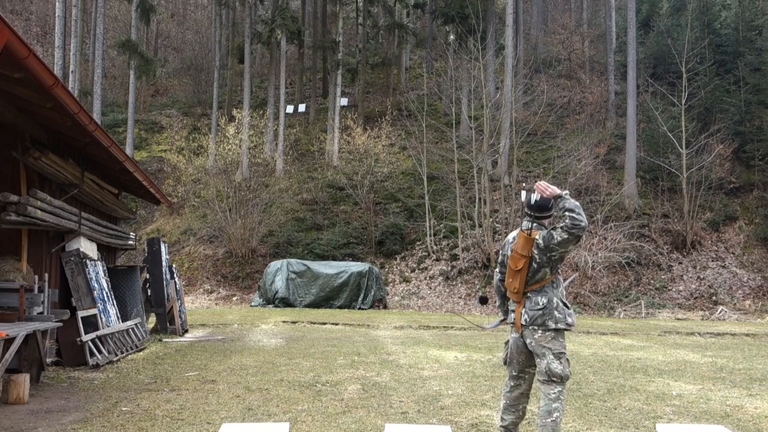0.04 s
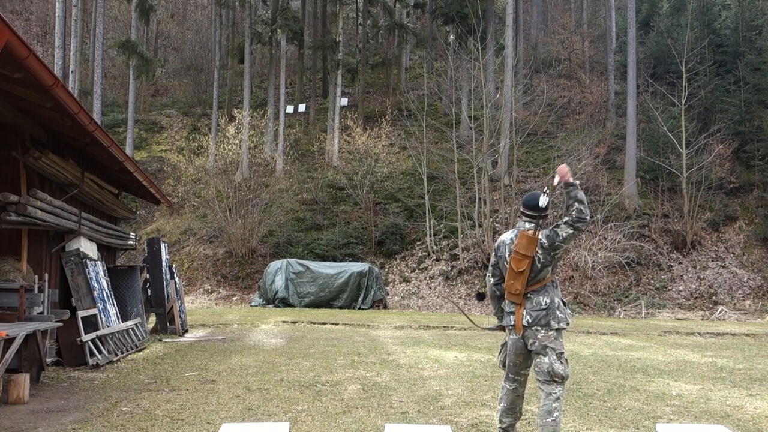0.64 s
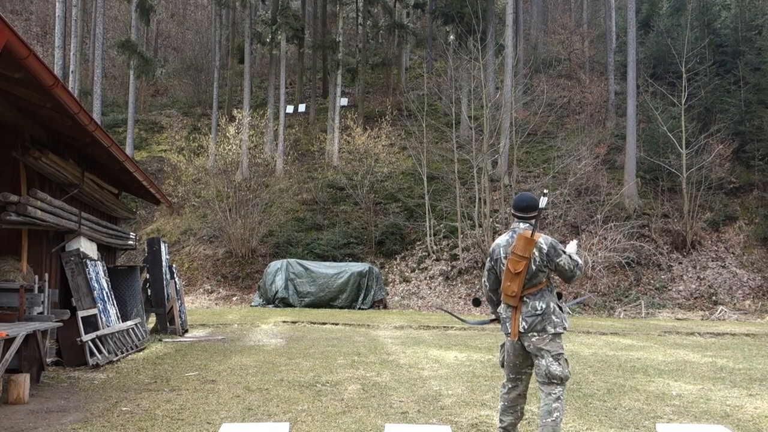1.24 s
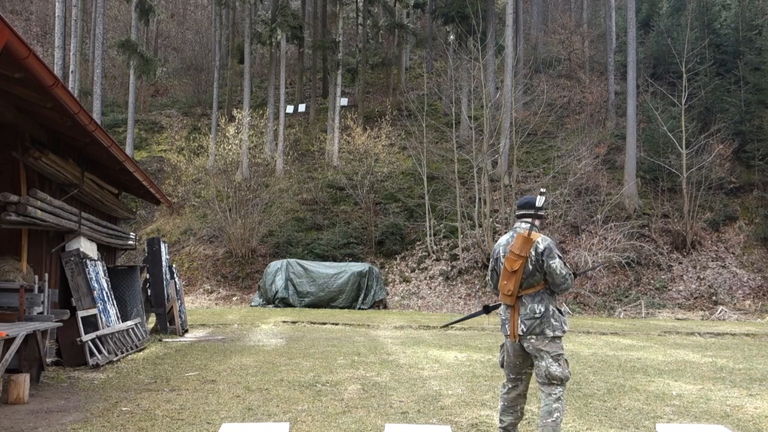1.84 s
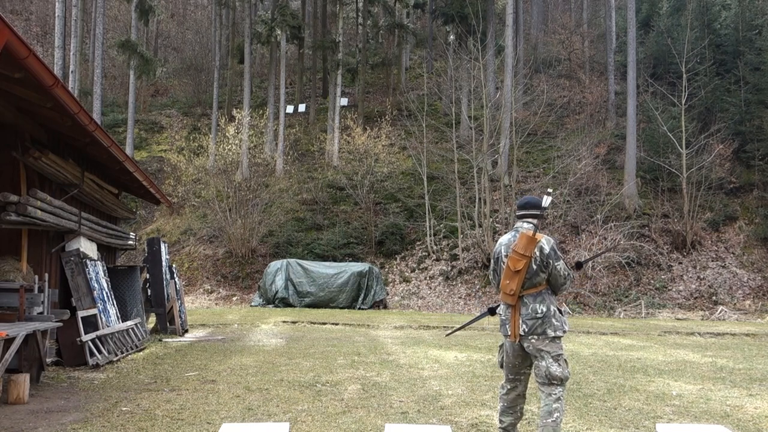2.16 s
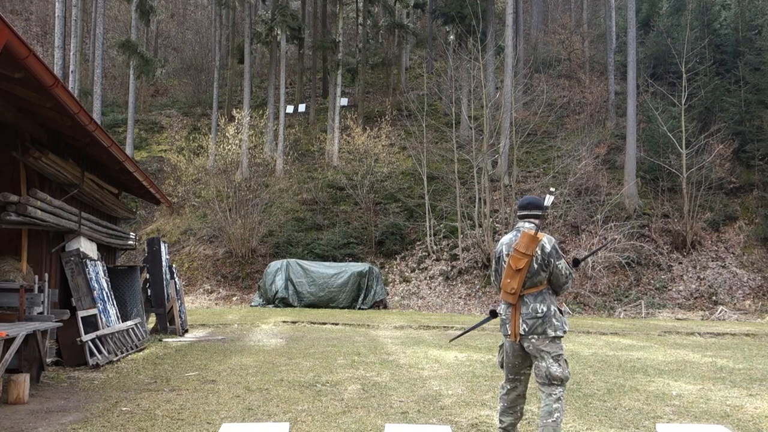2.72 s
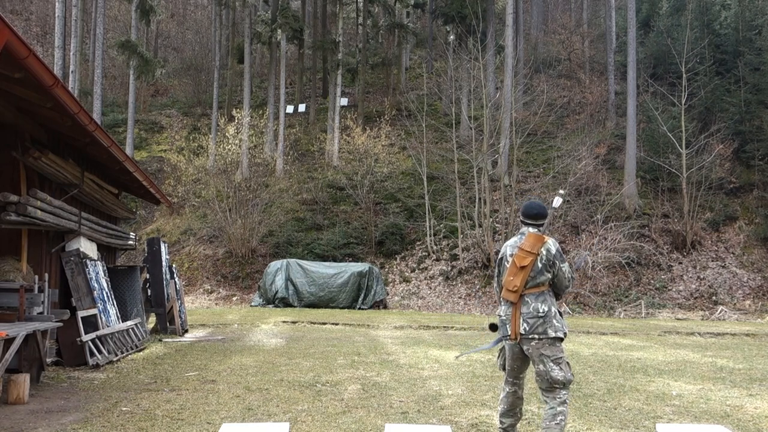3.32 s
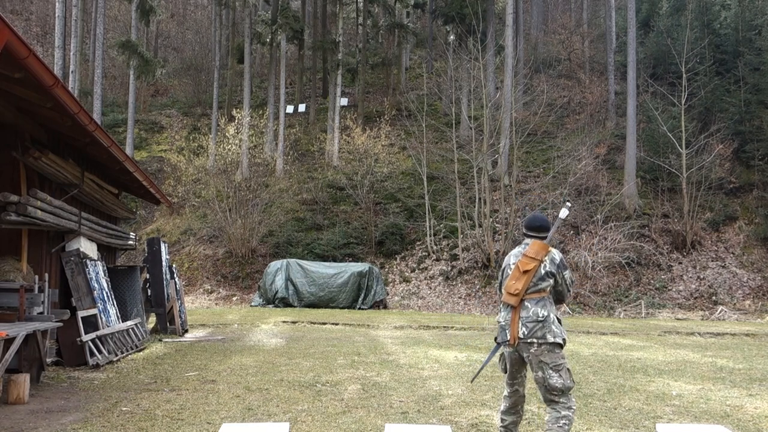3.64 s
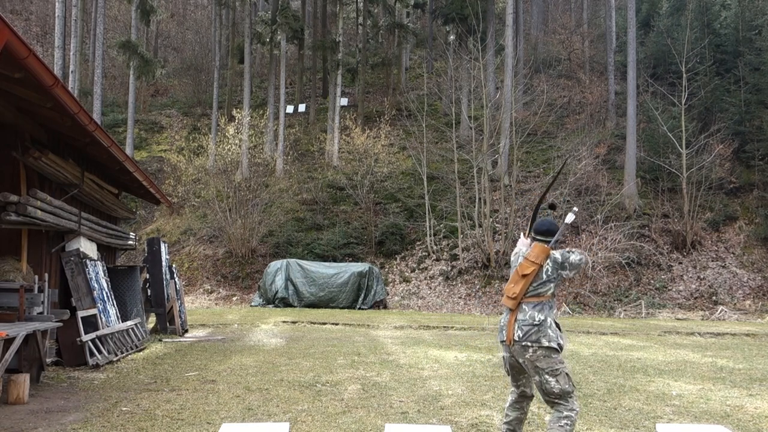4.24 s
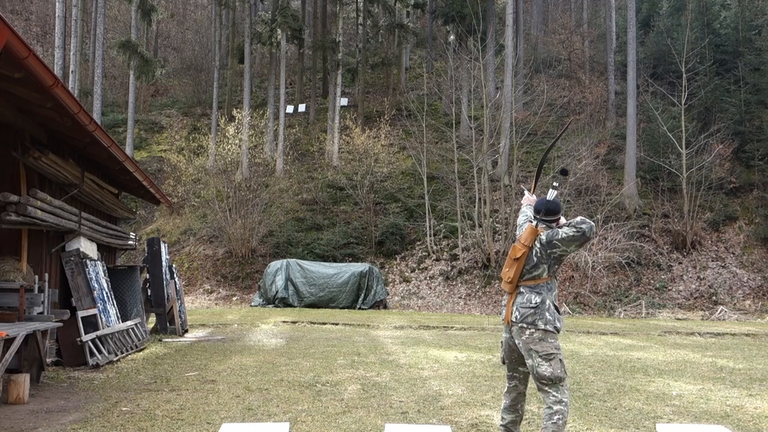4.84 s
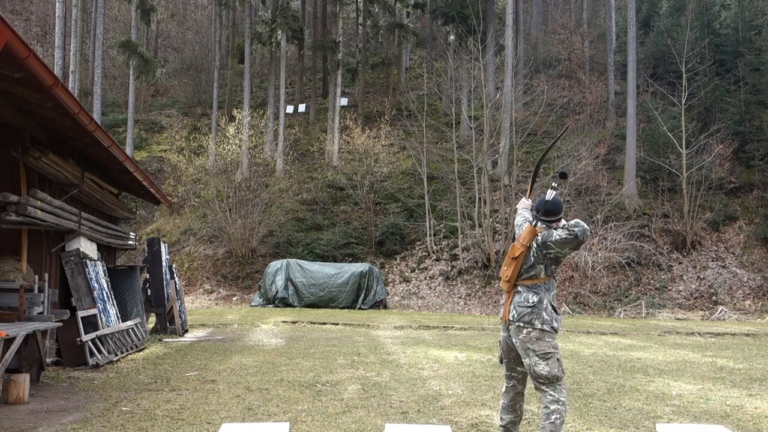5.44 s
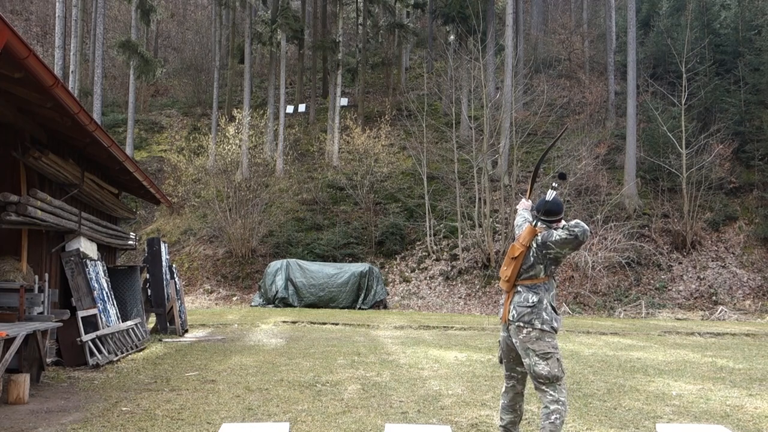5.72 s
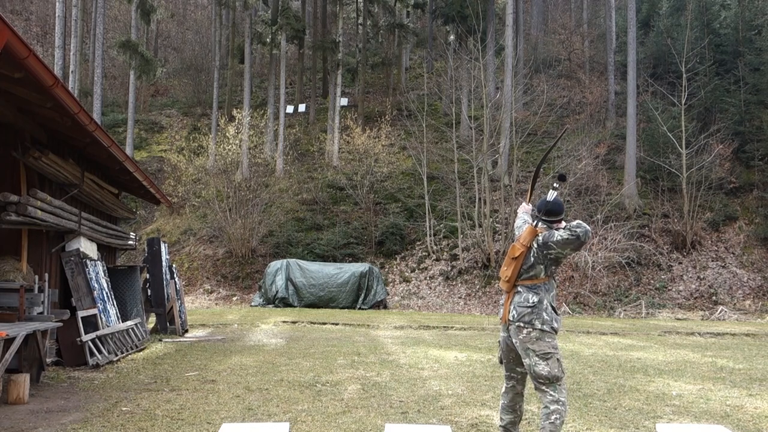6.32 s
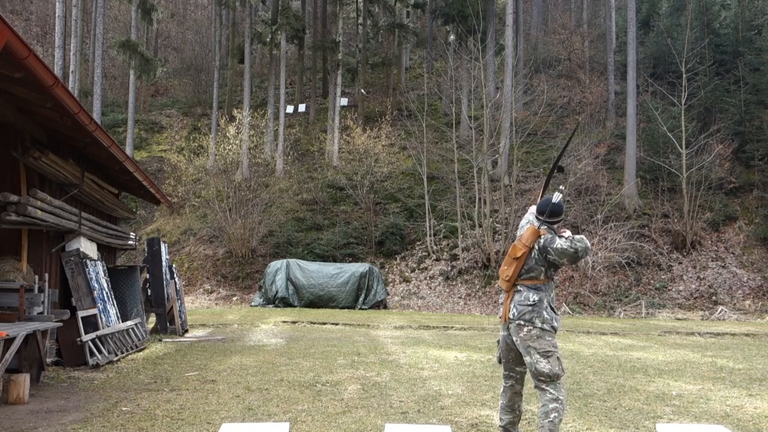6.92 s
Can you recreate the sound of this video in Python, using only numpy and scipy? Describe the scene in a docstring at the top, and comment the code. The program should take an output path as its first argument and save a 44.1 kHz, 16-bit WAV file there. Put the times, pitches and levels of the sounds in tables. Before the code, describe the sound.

Gusty wind rumbles on the microphone while arrows rattle lightly, faint birds chirp, and a bow fires with a sharp snap.

```python
"""Gusts of wind rumble and thump on the microphone while arrows knock together in a back quiver.
An archer at the forest edge pulls one out, clicks it onto the string and, near the end, shoots.
The string cracks taut and shakes the bow; the shot echoes off a wooden shed and dies among the trees.
The wind noise comes from eddies, little swirls of air that sweep over the microphone's two openings.
Small birds call over the soft hiss of the forest."""
import sys
import numpy as np
from scipy import signal
from scipy.fft import rfft, irfft
from scipy.io import wavfile
from scipy.ndimage import uniform_filter1d, minimum_filter1d, map_coordinates

SR = 44100
rng = np.random.default_rng(int(sys.argv[2]) if len(sys.argv) > 2 else 0)


def to_wav(s):
    """Save 16-bit WAV."""
    ch = np.atleast_2d(s).T  # columns
    pcm = np.round(np.clip(ch, -1, 1) * 32767)  # PCM
    wavfile.write(sys.argv[1], SR, pcm.astype(np.int16))


N = 311787
T = np.arange(N) / SR
HZ = np.maximum(np.arange(N // 2 + 1) * SR / N, 1)


# blows of the string on the bow (time [s], level [dB], treble boost [dB per octave])
STRING_BLOWS = [(6.798, -33, -1.5), (6.8, -27, 0.5), (6.8036, -25, -3.5), (6.8171, -33.5, -1.5)]
# ringing tones of bow, string and arrow (pitch [Hz], level [dB], time to fade by 60 dB [s])
BOW_TONES = [(118.6, -1.5, 0.1), (330, 2, 0.06), (387, 13.5, 0.036), (484.6, 5, 0.046), (716, -4, 0.039),
             (853, -2, 0.07), (1099, -2, 0.036), (1200, -7, 0.084), (2012, -10, 0.065), (2232, -8, .025),
             (2426, -1, 0.033), (2940, -2, 0.05), (3040, -6, 0.055), (3440, -6, 0.04), (4136, -13, 0.04),
             (5000, -20, 0.02), (6940, -4, 0.0088)]
# tone colour of the string's crack (frequency [Hz], level [dB])
CRACK_COLOUR = [(150, 5), (500, 9), (1500, -1), (2800, -3), (4500, -3), (7500, -12), (11000, -23),
                (15500, -42)]
CRACK_S = STRING_BLOWS[1][0]
def shot():
    """The string swishes forward, cracks taut and shakes the bow."""
    bow = np.zeros(N)
    for s, db, tilt_db in STRING_BLOWS:
        add(bow, s, undb(db) * strike(BOW_TONES, tilt_db, scatter_db=1.5))
    since = T - CRACK_S
    gap = abs(since)
    swish = undb(-41) * hiss(N, 1500, 2900) * fade(gap, .075) * (since < 0)
    crack = undb(-25.5) * noise(CRACK_COLOUR) * np.where(since < 0, fade(gap, .0035), fade(gap, .011))
    rattle = undb(-42) * hiss(N, 1300, 3800) * fade(gap, .05) * (since > 0)
    # the feathers hiss for a moment as the arrow flies off
    feathers = noise([(600, 12), (1800, -3), (3000, -3), (5000, -11), (8000, -18),
                      (12000, -30), (15500, -29)])
    flight = np.clip(since / .01, 0, 1) * np.exp(-(np.maximum(since, 0) / .085) ** 2)
    return bow + swish + crack + rattle + undb(-44) * feathers * flight


# tone colour of the crack as the trunks scatter it (frequency [Hz], level [dB])
WASH_COLOUR = [(400, 1), (1200, -5), (3000, 3), (5000, -4), (8000, -11), (12000, -22), (15500, -40)]
def shot_wash():
    """The crack comes back from the forest edge as a smooth wash, different in each ear."""
    since = np.maximum(T - CRACK_S, 0)
    level = undb(-48) * fade(since, .21) + undb(-51.5) * fade(since, .99)
    return np.array([noise(WASH_COLOUR), noise(WASH_COLOUR)]) * level * np.minimum(since / .0055, 1)


# arrows knocking together (time [s], relative level [dB], treble boost [dB per octave])
KNOCKS = [(.016, -65, 3), (0.169, -64.5, -8.5), (.315, -66, -4.5), (.343, -72, 2.5), (0.363, -56.5, 8),
          (.413, -69.5, 8.5), (0.684, -57.5, 3.5), (0.725, -58, 12.5), (0.753, -45.5, 4), (0.763, -54, 13),
          (0.777, -53, 3), (0.7849, -51, 8), (.812, -61.5, 16.5), (.839, -65.5, 19), (0.858, -62.5, 13.5),
          (.931, -53.5, -0.5), (.938, -54.5, -1.5), (0.953, -56.5, 7), (0.959, -51, 8), (1.0168, -64, 16),
          (1.027, -65.5, 15)]
# tones of a bending arrow shaft (pitch [Hz], level [dB], time to fade by 60 dB [s])
SHAFT_TONES = [(2300, 5.5, 0.045), (2710, 1, 0.072), (3290, -0.5, 0.1), (3880, 0, 0.09), (4330, 11, 0.0089),
               (5040, 0.5, 0.048), (5640, -1.5, 0.04), (5900, -4.5, 0.037), (6500, -5, 0.04),
               (7210, -1, 0.04), (8070, -7, 0.04), (8750, -10, 0.045), (9810, -10.5, 0.042),
               (10700, -20, 0.047), (11680, -22, .05), (12700, -21, .05), (13550, -27.5, .04),
               (15200, -32, .03)]
# one arrow sliding along the others (peak time [s], length [s], relative level [dB])
SCRAPES = [(.03, .04, -66.5), (.18, 0.033, -66.5), (.42, 0.15, -70), (.77, 0.081, -57), (.88, .14, -66),
           (.95, 0.04, -56.5), (1.08, 0.11, -81.5)]
def quiver():
    """The arrow being pulled out knocks on its neighbours, chatters and scrapes along them."""
    out, t = np.zeros(N), T[:SR // 10]
    for s, db, tilt_db in KNOCKS:
        chatter = .16 * rng.standard_normal(len(t)) * fade(t, .035)
        chatter[0] = 1  # the knock itself
        ring = signal.fftconvolve(strike(SHAFT_TONES, tilt_db, scatter_db=-1.5), chatter)
        add(out, s, undb(db - 1) * unit_start(ring))
        add(out, s, undb(db - 3) * hiss(len(t), 3200, 11000) * fade(t, .036))
    rubbing = rng.standard_normal(N)
    scrape = unit(signal.oaconvolve(rubbing, strike(SHAFT_TONES, 0, scatter_db=5))[:N])
    out += scrape * np.sqrt(swells(SCRAPES, edge=3.8, rise=.4)) * undb(-8 + 5.5 * walk(150))
    return band(out, 1400, 13500)


# the arrow snapping onto the string (time [s], relative level [dB])
NOCK_CLICKS = [(1.5825, -50), (1.5852, -46)]
# ringing tones of each click (pitch [Hz], level [dB], time to fade by 60 dB [s])
NOCK_TONES = [(2115, -1, 0.099), (2790, -6.5, 0.035), (3450, 3, 0.011), (3950, 2.5, 0.01),
              (4500, 4, 0.0087), (6460, -10, .03), (6900, -2.5, 0.01), (8900, -9.5, .006),
              (10600, -17, .006)]
def nock():
    """The nock, the notch at the arrow's tail, springs over the string with a dry double click."""
    out, t = np.zeros(N), T[:SR // 20]
    for s, db in NOCK_CLICKS:
        add(out, s, undb(db - 1.5) * strike(NOCK_TONES, 0, scatter_db=-2))
        add(out, s, undb(db - 7) * hiss(len(t), 2800, 7500) * fade(t, .018))
    return out


# wind direction (time [s], base delay from the left opening to the right [ms])
CROSSING = [(3.4, 0.42), (4.7, -0.47)]
def wind():
    """Eddies cross the microphone: large ones rumble, small ones flutter, strong ones thump."""
    large_db, small_db = wind_levels()
    flurry = walk(120)
    speed = np.clip(2 ** ((small_db + 28) / 30), .45, 1.3) * np.exp(.17 * flurry)  # louder is faster
    lag_ms = curves(CROSSING)[0] + .09 * walk(14)  # each kind of eddy scales this delay
    rumble = turbulence(speed, 1.4 * lag_ms, 54, 500, own_db=-15.5)
    rumble *= undb(large_db + 1.5 + 2 * flurry)
    flutter = turbulence(speed, .73 * lag_ms, 506, 12000, own_db=-17.5)
    flutter *= undb(small_db + 2 + 1.3 * flurry + 3.68 * walk(320))
    air = rumble + flutter + sputter(small_db, flurry, .32 * lag_ms)
    # a strong eddy pushes the others aside as it passes
    swings, room = thumps(small_db, speed, .81 * lag_ms)
    air = air * np.maximum(1 - .64 * room, 0) + swings
    # the right opening is more sheltered from the smallest eddies
    air[1] = signal.filtfilt(*signal.butter(1, 1500, fs=SR), air[1])
    return air


# the breeze under the gusts, dropping about halfway through (time [s], rumble level [dB])
BREEZE = [(0, -24), (.72, -26), (1.12, -24), (1.24, -26.5), (1.85, -25), (2.33, -28), (2.68, -28.5),
          (3.15, -26.5), (3.42, -32), (3.58, -43), (4.15, -58.5), (4.62, -51), (4.95, -44), (5.24, -42.5),
          (5.32, -67), (5.72, -63.5), (5.9, -40.5), (6.5, -37), (6.6, -51), (7.07, -44.5)]
# gusts (peak time [s], length [s], rumble level [dB], flutter level [dB])
GUSTS = [(0.055, 0.044, -18, -22), (0.112, 0.031, -24.5, -26), (0.138, 0.027, -18, -23),
         (0.185, 0.041, -17.5, -18.5), (.228, 0.028, -9.5, -24.5), (0.257, 0.024, -17.5, -27),
         (0.302, 0.017, -17.5, -29.5), (0.363, .035, -15.5, -20), (0.452, 0.044, -16.5, -29),
         (0.497, 0.029, -16, -28), (0.514, 0.013, -30, -20), (0.576, 0.037, -17, -24.5),
         (0.747, 0.032, -23.5, -27.5), (0.794, 0.026, -14, -20.5), (0.834, 0.036, -19, -21.5),
         (0.918, 0.04, -19, -27), (0.968, 0.051, -19.5, -27), (1.055, 0.034, -30, -29),
         (1.177, 0.048, -43, -38), (1.364, 0.052, -15.5, -20), (1.46, 0.022, -24.5, -33),
         (1.55, 0.06, -21.5, -34), (1.645, 0.04, -21, -34), (1.727, 0.023, -16.5, -27),
         (1.8, .04, -21, -37.5), (1.87, 0.044, -21.5, -37), (1.95, 0.019, -14, -28),
         (1.982, 0.021, -22, -33), (2.098, 0.049, -26, -31), (2.151, 0.018, -36, -31.5),
         (2.19, .018, -14.5, -25), (2.255, .05, -24.5, -41), (2.404, 0.048, -26, -49),
         (2.471, 0.039, -25.5, -42), (2.529, 0.018, -21.5, -42), (2.628, 0.034, -23.5, -35),
         (2.757, 0.032, -17, -34), (2.884, 0.041, -21, -26), (2.949, 0.036, -30.5, -31),
         (3.01, 0.061, -20, -26), (3.125, 0.062, -19.5, -28), (3.283, 0.04, -24.5, -42),
         (3.359, 0.04035, -28, -48), (3.421, 0.045, -26.5, -52), (3.65, 0.064, -28.5, -47.5),
         (3.727, 0.033, -28.5, -39), (3.79, 0.049, -39, -62), (4.007, 0.034, -44, -70),
         (4.407, 0.042, -50.5, -82), (4.726, 0.04, -22.5, -43), (4.924, 0.046, -34.5, -69),
         (5.008, 0.031, -39, -62.5), (5.122, 0.054, -38.5, -67), (5.181, 0.018, -28, -53.5),
         (5.235, 0.049, -40, -69), (5.805, 0.029, -33, -60.5), (5.9, 0.045, -34, -37.5),
         (5.954, 0.016, -25.5, -48.5), (5.999, 0.041, -36, -56), (6.12, 0.059, -25, -46),
         (6.225, 0.041, -26.5, -46), (6.285, 0.041, -30, -43), (6.689, 0.025, -28, -57.5),
         (6.764, 0.047, -36.5, -63)]
def wind_levels():
    """Gusts ride on the breeze; gives the relative levels in dB of the large and the small eddies."""
    breeze_db = curves(BREEZE)[0] + 1.5 * walk(28)  # quick surges and lulls
    flutter_db = -37 + 1.9 * (breeze_db + 24)  # flutter grows faster than rumble
    s, length, rumble_peaks, flutter_peaks = np.transpose(GUSTS)
    levels = []
    for steady_db, peaks in ((breeze_db, rumble_peaks), (flutter_db, flutter_peaks)):
        gusts = swells(zip(s, length, peaks), edge=2.2, rise=.45)
        levels.append(10 * np.log10(undb(steady_db) ** 2 + gusts))
    return levels


# tone colour of swirling air when speed is 1 (frequency [Hz], level [dB])
EDDY_COLOUR = [(20, -15), (60, -5.5), (140, 2.5), (280, 3), (450, -2.5), (700, -15), (1000, -26),
               (1500, -43.5), (2500, -58), (5000, -79)]
def turbulence(speed, lag_ms, lo_hz, hi_hz, own_db):
    """Eddies of one size range pass both openings at an even level; faster air sounds higher."""
    travel, eddies = np.cumsum(speed), noise(EDDY_COLOUR)
    left = map_coordinates(eddies, [travel], order=3, mode="mirror")
    right = map_coordinates(eddies, [travel - speed * lag_ms * SR / 1000], order=3, mode="mirror")
    # each opening also sheds a few eddies of its own
    own = undb(own_db) * map_coordinates(eddies, [travel + N // 2], order=3, mode="mirror")
    air = band(np.array([left + own, right - own]), lo_hz, hi_hz, order=3)
    return air / np.sqrt(uniform_filter1d(air.mean(0) ** 2, SR // 35) + 1e-9)


def sputter(small_db, flurry, lag_ms):
    """Fast air breaks into tiny eddies that sputter."""
    left = noise([(500, -21), (1000, 9.5), (1600, -5), (2600, -28.5), (6000, -50.5)])
    right = map_coordinates(left, [(T - lag_ms / 1000) * SR], order=3, mode="wrap")
    return np.array([left, right]) * undb(np.minimum(small_db + 27, 2) * 3.4 - 44 + 6.6 * flurry)


# single strong eddies (time [s], relative level [dB], pitch [Hz])
BUFFETS = [(0.066, 1, 700), (.1385, -4, 706), (.178, -4.5, 660), (.2235, -5, 710), (.234, -2, 750),
           (.2625, -8, 685), (.3485, -2, 755), (0.363, -3.5, 717), (.487, -9, 748), (0.5096, 5, 890),
           (0.5803, -3, 635), (.635, -2, 290), (.66, -17, 707), (0.793, 0, 726), (0.8395, -2, 661.8),
           (.886, -6, 579.5), (0.925, -4, 403.4), (.951, -4.5, 536.5), (.989, -12, 595.6),
           (1.0233, -6, 540), (1.1187, -10.5, 539.5), (1.2105, -12.5, 479.6), (1.338, 2, 659.6),
           (1.362, -6, 876.4), (1.3852, 6, 803.6), (1.405, -13.5, 551), (1.625, -11.5, 560),
           (1.6555, -14.5, 531), (1.722, -8, 615.4), (1.861, -24, 558.1), (1.9508, -8.5, 770),
           (1.982, -16, 718), (2.185, -6, 644), (2.1949, -4, 569), (2.226, -9.5, 350),
           (2.302, -15.5, 359.4), (2.869, -6.5, 578.7), (3.0101, 0.5, 533.3), (3.0815, -2.5, 518.5),
           (3.136, -13, 449.4), (3.171, -11, 451.7), (3.198, -6, 359.1), (3.271, -14.5, 300.1),
           (3.356, -16, 260.3), (3.7312, -13.5, 341.5), (3.8528, -20, 184.2), (4.7241, -17, 220),
           (4.7436, -14, 160.1), (5.1824, -19.5, 196.2), (5.955, -18, 289.9), (6.095, -18, 100),
           (6.1151, -14.5, 306.2), (6.237, -17.5, 240), (7.037, -18.5, 200.2)]
def thumps(small_db, speed, lag_ms):
    """Single eddies make short swings of pressure; also gives how much room they take in the wind."""
    swings, room, t = np.zeros((2, N)), np.zeros(N), T[:SR // 25] - .02
    for s, db, hz in BUFFETS + pops(small_db, speed):
        add(room, s + t[0], np.exp(-(hz * t / 1.71) ** 2))
        for channel, side in zip(swings, (-1, 1)):
            cycles = hz * (t - side * np.interp(s, T, lag_ms) / 2000)
            swing = np.sin(2 * np.pi * cycles) / np.cosh(np.minimum(abs(cycles) / .23, 50))
            add(channel, s + t[0], undb(db - .5) * swing)
    return swings, room


def pops(small_db, speed, per_second=38, max_db=-13):
    """Weaker eddies come at random, louder and higher in fast air; gives rows like BUFFETS."""
    wait, size, pitch = rng.random((1000, 3)).T
    s = np.cumsum(-np.log(1 - wait)) / per_second
    db = np.minimum(np.interp(s, T, small_db) + 10 + 5.5 * (2 * size - 1), max_db)
    hz = 494 * np.interp(s, T, speed) * 2 ** (pitch - .5)
    return list(np.transpose([s, db, hz])[s < T[-1]])


# ticks in the wind (time [s], level [dB])
TICKS = [(.22, -55), (0.4866, -54), (.511, -52), (1.363, -46.5)]
def ticks():
    """Thin ticks in the hardest gusts, gone within a few milliseconds."""
    out, t = np.zeros(N), T[:SR // 100]
    for s, db in TICKS:
        add(out, s, undb(db) * hiss(len(t), 1800, 4500) * fade(t, .0066))
    return out


# song notes (time [s], length [s], pitch [Hz], relative level [dB],
# glide [share of the pitch], wobble [share of the pitch])
SONG_NOTES = [(1.623, 0.24, 3097, -59.5, -0.039, 0.031), (4.245, 0.074, 3347, -61, 0.019, 0.011),
              (4.348, 0.067, 4288, -66, -0.02, .009), (4.578, 0.06, 3212, -57, 0.022, 0.009),
              (4.671, 0.055, 4310, -62, 0.016, 0.008), (4.916, 0.069, 3280, -53, 0.006, 0.008),
              (5.023, 0.077, 4343, -62, .005, .011), (5.238, 0.06, 3230, -55, 0.022, .009),
              (5.35, 0.13, 4300, -64.5, 0.0059, 0.01), (5.582, 0.099, 3236, -58, -0.02, 0.0079),
              (5.673, 0.067, 4316, -61, -0.0063, .013)]
def songbird():
    """A two-note song from deep in the forest; each note glides a little, wobbles and fades."""
    out = np.zeros(N)
    for s, length, hz, db, glide, wobble in SONG_NOTES:
        n = int(length * SR)
        progress = np.linspace(0, 1, n)
        pitch = hz * (1 + glide * (progress - .5) + wobble * walk(400)[:n])
        add(out, s, note(pitch, db - 5 - 4 * progress + 2 * walk(70)[:n]))
    return out


# another bird's chirps (time [s], level [dB])
CHIRPS = [(4.853, -60), (4.951, -55), (5.049, -54), (5.153, -50), (5.258, -53.5)]
# the swoop of each chirp (time into the chirp [s], pitch [Hz])
SWOOP = [(0, 3650), (.006, 3020), (.011, 2710), (.02, 2455), (.031, 2430), (.045, 2834), (.055, 2250)]
def chirper():
    """A run of chirps that grows louder: each plunges, thins at the turn and flicks up again."""
    out, (at, pitch) = np.zeros(N), np.transpose(SWOOP)
    t = T[:int(at[-1] * SR)]
    turn_db = -11 * np.exp(-((t - .025) / .008) ** 2)
    for s, db in CHIRPS:
        hz = np.interp(t, at, pitch) * (1 + .006 * walk(250)[:len(t)])
        add(out, s, note(hz, db + turn_db))
    return out


def whistler(start_s=2.768, length_s=.182, sag_hz_per_s=4400):
    """One thin, high bird call that flicks up, sags and drops away."""
    out, t = np.zeros(N), T[:int(length_s * SR)]
    flicks = np.exp(-t / .0092) + np.exp((t - t[-1]) / .0092)
    hz = 8916 - sag_hz_per_s * t - 1700 * flicks + 40 * walk(300)[:len(t)]
    add(out, start_s, note(hz, -62 + 3 * walk(60)[:len(t)]))
    return out


# rising chirps and sinking whistles (time [s], relative level [dB])
RISING_CALLS = [(5.525, -60), (5.672, -59)]
SINKING_CALLS = [(0, -71.5), (.635, -72.5), (3.41, -76)]
# their tunes (time into the call [s], pitch [Hz])
RISE = [(0, 2846), (.025, 3610)]
SINK = [(0, 4560), (0.049, 4460), (.13, 4180)]
def far_calls():
    """Birds call from inside the forest; no two calls are quite alike."""
    out = np.zeros(N)
    for calls, tune in ((RISING_CALLS, RISE), (SINKING_CALLS, SINK)):
        at, pitch = np.transpose(tune)
        n = int(at[-1] * SR)
        for s, db in calls:
            hz = np.interp(T[:n], at, pitch) * (1 + .009 * walk(250)[:n])
            add(out, s, note(hz, db - .5 + 2.5 * walk(110)[:n]))
    return out


# distant bird trills (time [s], length [s], pitch [Hz], level [dB])
TRILLS = [(1.1, 0.36, 7000, -79.5), (4.398, 0.65, 7090, -83), (6.123, 0.69, 7130, -83),
          (6.381, 0.36, 2690, -66.5)]
def far_trills(spread=.075):
    """A fast trill from far away blurs into a narrow band of noise."""
    out = np.zeros(N)
    for s, length, hz, db in TRILLS:
        n, edges = int(length * SR), (hz * (1 - spread), hz * (1 + spread))
        trill = unit(band(hiss(n, *edges), *edges))
        add(out, s, undb(db + 2 * walk(30)[:n]) * signal.windows.tukey(n, .5) * trill)
    return out


# tone colour of the forest hiss (frequency [Hz], level [dB])
FOREST_COLOUR = [(20, -7), (70, 9.5), (130, 1), (270, -4), (400, 4), (720, -2), (1140, -1.5), (1620, -5),
                 (2170, -6.5), (3260, -12.5), (4380, -18.5), (4900, -22.5), (8500, -32), (15500, -43)]
# how it reaches the ears (frequency [Hz], left-right likeness [-1 to 1], left minus right [dB])
FOREST_STEREO = [(60, .94, -2.5), (350, .9, -0.5), (700, 0.84, -0.5), (1200, -0.051, 5), (2400, 0.23, 6),
                 (4400, -0.051, 1.5), (8000, -.1, -0.5)]
def forest():
    """A far hiss swells gently, then holds; it is brighter on the left, its bass alike in both ears."""
    likeness, pan_db = over_hz(FOREST_STEREO)
    shared = rfft(noise(FOREST_COLOUR))
    apart = rfft(noise(FOREST_COLOUR)) * np.sqrt((1 - likeness) / (1 + likeness))
    sides = np.array([[1], [-1]])
    ears = irfft((shared + sides * apart) * undb(sides * pan_db / 2), N)
    return ears * undb(-54 - 5.5 * np.exp(-T / 1.3) + .41 * walk(3.5))


def outdoors(x, shed_db, trees_db):
    """Add quick echoes off the shed and a long scatter from the trunks, whose treble dies first."""
    t, ears = T[:int(1.2 * SR)], []
    for _ in range(2):
        near, low, high = rng.standard_normal((3, len(t)))
        shed = band(near, 900, 11000) * np.exp(-((t - .052) / .045) ** 2)
        trees = band(low, 500, 4200) * fade(t, .93) + band(high, 4200, 12000) * fade(t, .71)
        trees *= np.minimum(t / .0086, 1)
        echo = (undb(shed_db) * unit(shed) + undb(trees_db) * unit(trees)) / np.sqrt(len(t))
        ears.append(x + signal.fftconvolve(x, echo)[:N])
    return np.array(ears)


def strike(tones, tilt_db, scatter_db):
    """One blow sets fading tones ringing; how loud each is depends on where the blow lands."""
    t = T[:SR // 8]
    hz, db, t60 = np.transpose(tones)[:, :, None]
    weight, detune, side = rng.standard_normal((len(tones), 3)).T[:, :, None]
    gain = np.sign(side) * undb(db + tilt_db * np.log2(hz / hz.mean()) + scatter_db * weight)
    rings = gain * fade(t, t60) * np.sin(2 * np.pi * hz * (1 + .0047 * detune) * t)
    return unit_start(rings.sum(0))


def note(hz, db):
    """A pure tone that follows a pitch curve, starting and ending softly."""
    return undb(db) * signal.windows.tukey(len(hz), .25) * np.sin(2 * np.pi * np.cumsum(hz) / SR)


def swells(rows, edge, rise):
    """Summed power of swells; edge sets their steepness, rise the share of their length spent rising."""
    power = np.zeros(N)
    for s, length, db in rows:
        near = slice(max(int((s - 3 * length) * SR), 0), int((s + 3 * length) * SR))
        since = (T[near] - s) / length
        power[near] += undb(db) ** 2 * .5 ** (np.maximum(-since / rise, since / (1 - rise)) ** edge)
    return power


def undb(db):
    """Turn decibels into a gain."""
    return 10 ** (np.asarray(db) / 20)


def unit(x):
    """Scale to an average strength (rms) of 1."""
    return x / np.sqrt(np.mean(x ** 2))


def unit_start(x):
    """Scale so that the first 5 ms have strength 1."""
    return x / np.sqrt(np.mean(x[:SR // 200] ** 2))


def curves(rows):
    """The columns of a time table, one value a sample."""
    s, *columns = np.transpose(rows)
    return [np.interp(T, s, c) for c in columns]


def over_hz(rows):
    """The columns of a frequency table, one value for each frequency in HZ."""
    hz, *columns = np.transpose(rows)
    return [np.interp(np.log(HZ), np.log(hz), c) for c in columns]


def noise(colour):
    """Noise of strength 1 with the given tone colour."""
    return unit(irfft(rfft(rng.standard_normal(N)) * undb(over_hz(colour)[0]), N))


def hiss(n, lo_hz, hi_hz):
    """n samples of noise of strength 1 between two frequencies."""
    return unit(band(rng.standard_normal(n), lo_hz, hi_hz))


def walk(rate):
    """A random wobble of strength 1, changing about rate times a second."""
    wobble = np.interp(T * rate, np.arange(4096), rng.standard_normal(4096))
    return unit(uniform_filter1d(wobble, int(SR / rate)))


def band(x, lo_hz, hi_hz, order=2):
    """Keep mostly what lies between two frequencies."""
    return signal.sosfilt(signal.butter(order, [lo_hz, hi_hz], "band", fs=SR, output="sos"), x)


def fade(t, t60):
    """A fade that loses 60 dB in t60 seconds."""
    return np.exp(-np.log(1000) * t / t60)


def add(track, s, sound):
    """Mix a sound into a track at time s."""
    i = max(int(s * SR), 0)
    track[i:i + len(sound)] += sound[:max(N - i, 0)]


def scene():
    """The archer and the birds with their echoes, mixed with wind and forest hiss."""
    archer = outdoors(quiver(), shed_db=-17.5, trees_db=-14.5)
    archer += outdoors(nock(), shed_db=-15, trees_db=-9)
    archer *= undb([[-1], [1]])  # the arrow is handled a little to the right
    archer += outdoors(shot(), shed_db=-16.5, trees_db=-14) + shot_wash()
    birds = outdoors(songbird(), shed_db=-8.5, trees_db=-1)
    birds += outdoors(far_calls() + far_trills(), shed_db=-19, trees_db=-3.5)
    birds += outdoors(whistler(), shed_db=-8.5, trees_db=-13.5)
    birds += outdoors(chirper(), shed_db=-20, trees_db=-10)
    return archer + wind() + ticks() + birds + forest()


def record(dry):
    """A limiter softly turns down the strongest thumps; the deepest bass and highest treble are cut."""
    dry = signal.sosfilt(signal.butter(2, 28, "high", fs=SR, output="sos"), dry)
    ceiling, hold, knee = .56, SR // 150, 3
    needed = (1 + (abs(dry).max(0) / ceiling) ** knee) ** (-1 / knee)
    gain = uniform_filter1d(minimum_filter1d(needed, 2 * hold), hold)
    limited = dry * uniform_filter1d(gain, hold)
    return signal.sosfilt(signal.ellip(8, .2, 70, 15700, fs=SR, output="sos"), limited)


dry = scene()
out = record(dry)
to_wav(out)
```